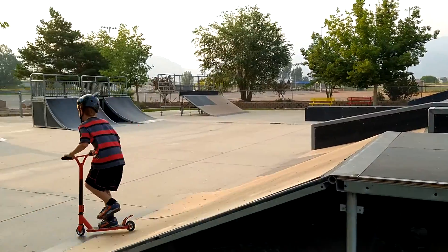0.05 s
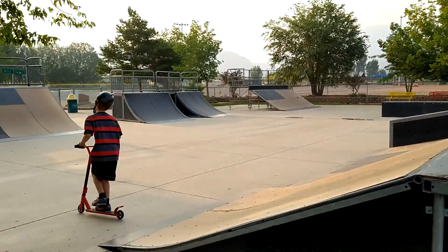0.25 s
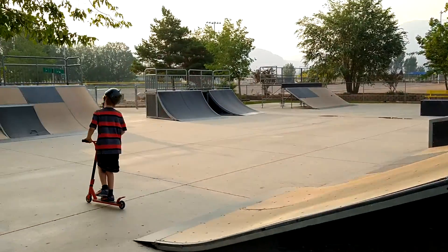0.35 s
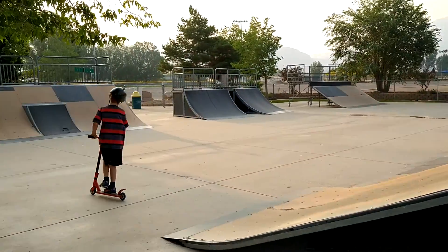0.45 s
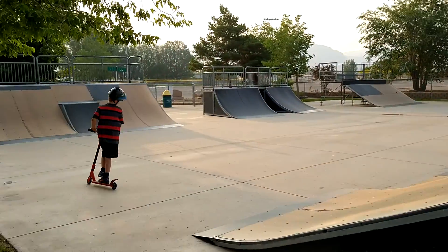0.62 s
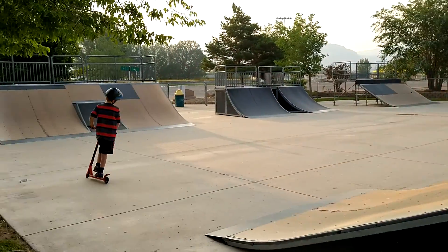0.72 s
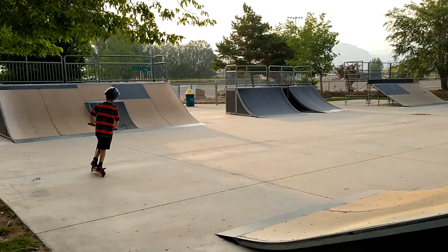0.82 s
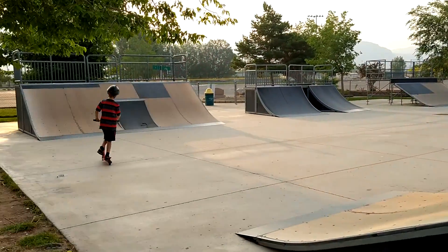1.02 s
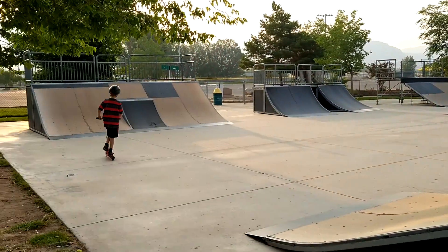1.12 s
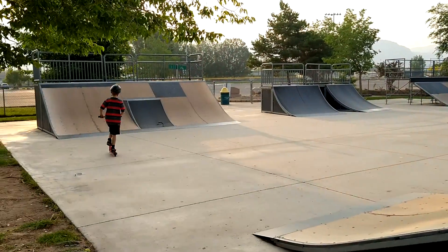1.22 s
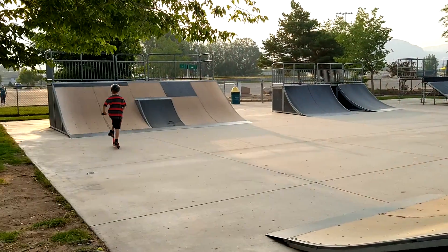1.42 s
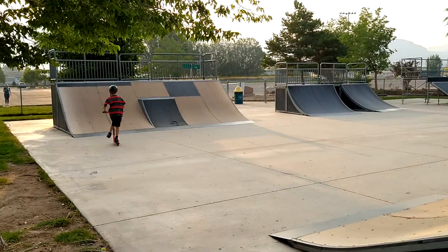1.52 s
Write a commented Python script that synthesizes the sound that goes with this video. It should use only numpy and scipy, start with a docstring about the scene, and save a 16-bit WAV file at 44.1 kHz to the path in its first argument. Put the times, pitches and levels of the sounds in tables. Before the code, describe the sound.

Close to a mono microphone in a quiet outdoor skate park, a kick scooter drums down a ramp, chatters off the lip and clatters onto concrete. Its hissing wheels and small rattles then move away.

```python
"""A hollow rumble, close by: a kick scooter rolls down a skate ramp whose panels drum under the wheels.
It chatters off the lip and lands on gritty concrete with a bright clatter that rings its metal frame.
A loose part clacks, then the hissing wheels and small rattles move away from the microphone.
Behind lies the quiet air of an open park, with faint far tones and a thin whistle. One mono microphone."""
import sys
import numpy as np
from scipy import signal
from scipy.fft import rfft, irfft, next_fast_len
from scipy.io import wavfile
from scipy.ndimage import map_coordinates

SR = 44100
rng = np.random.default_rng(int(sys.argv[2]) if len(sys.argv) > 2 else 0)


def materialize(psi):
    """Save the field psi as 16-bit PCM at rate SR to the path in sys.argv[1].

    A 1-D psi becomes a single channel; in a 2-D psi each row is a channel.
    """
    bounded = np.clip(np.atleast_2d(psi).T, -1, 1)
    quanta = np.round(bounded * 32767).astype(np.int16)
    wavfile.write(sys.argv[1], SR, quanta)


N = 68355

# the ramp drumming under the wheels: pitch_hz, level_db
DRUM_SPECTRUM = [(25, -34.5), (55, -5), (85, -12.5), (115, 3), (150, -4.5), (220, 1), (290, -11.5),
                 (400, -15.5), (700, -26.5), (1100, -24), (1450, -37), (1900, -31), (2300, -40.5),
                 (4000, -55)]
# its swell and fall: time_s, level_db
DRUM_LEVEL = [(0, -44.5), (.12, -43.5), (.21, -40), (.255, -30), (.32, -38.5), (.37, -33.5), (.42, -43),
              (.49, -56.5), (.58, -56.5), (.65, -57.5), (.76, -80.5), (1.55, -77.5)]
# wheels strike the ramp: start_s, level_db, tilt_db_per_octave
THUMPS = [(0.002, -37.5, -8.5), (.092, -35, -6), (0.167, -31, 0), (0.2319, -21.5, 3.5), (.271, -34.5, 4.5),
          (0.288, -26, -1.5), (0.311, -30, -0.5), (.351, -32.5, 7), (0.373, -37, -3.5)]
# modes of the ramp's panels: pitch_hz, level_db, t60_s
PANEL_MODES = [(75, -16.5, 0.2), (115.2, -8, 0.1594), (165, -3.5, 0.06), (214, 0.5, 0.089),
               (249.2, -4, 0.074), (310, -9, 0.048)]
# wheels and bearings: pitch_hz, level_db
HISS_SPECTRUM = [(900, -30), (1450, -5), (1900, -16), (2450, -13), (3150, -10), (3600, -.5), (4300, 1),
                 (5000, -3), (6500, -3), (8500, 0), (10800, -7), (11600, -14), (12700, -14), (13500, -22),
                 (14200, -35), (15800, -42)]
# their hiss before its lower part fades: time_s, level_db
HISS_LEVEL = [(0, -54), (.22, -54.5), (.33, -79), (.41, -48), (.5, -53), (.63, -58.5), (.79, -61),
              (.89, -58), (.99, -62.5), (1.16, -65.5), (1.23, -60), (1.35, -63.5), (1.55, -61.5)]
# the wheels' singing resonance: time_s, level_db
WHINE_LEVEL = [(0, -61.5), (.12, -65.5), (.2, -80.5), (.42, -56), (.52, -84), (.7, -69.5), (.82, -82.5),
               (1.55, -74.5)]
# open air: pitch_hz, level_db
AIR_SPECTRUM = [(25, -14), (50, 0), (80, 1.5), (120, 1.5), (200, -6.5), (310, -13.5), (520, -10), (800, -7),
                (1100, -7.5), (1500, -17), (1950, -18), (2600, -23.5), (4000, -39.5), (8000, -50.5)]
# light ticks of loose parts: start_s, level_db, tilt_db_per_octave
TICKS = [(.1865, -42, 1), (1.0708, -41.5, 2), (1.1348, -41.5, 0), (1.2016, -51, -1), (1.214, -47, -4),
         (1.22, -49, -4), (1.2695, -49, 1), (1.404, -43.5, 0), (1.449, -52, 0), (1.473, -49, 1),
         (1.517, -52, 0), (1.54, -49, 0)]
# dense small resonances of struck metal: pitch_hz, level_db
METAL_SPECTRUM = [(300, -20), (1000, -15), (1950, -21), (2350, -9), (2900, -7.5), (3600, -1), (4300, -1),
                  (5000, -4), (6300, -.5), (7400, 4.5), (9000, 3.5), (11000, 4.5), (11600, -7),
                  (12700, -5.5), (13500, -15), (15800, -32)]
# decay of the echo off the surrounding ramps: pitch_hz, t60_s
PARK_DECAY = [(200, 0.86), (3000, .45), (8000, 0.28), (14000, 0.27)]
# heavy metal contacts: start_s, level_db, tilt_db_per_octave
CLACKS = [(.2352, -29, -1), (.239, -36, -2), (.2435, -37, -1), (.2515, -42, -3), (.3376, -22, -2),
          (.3396, -11.5, -1.5), (.3442, -7.5, 2), (.3464, -6.8, 3), (.3515, -14, -1.5), (.3545, -19, -1),
          (.3612, -23, 2), (.3655, -27, 1), (.3705, -18.5, 2), (.377, -15, 2.5), (.3798, -17.5, 2),
          (.384, -24, 1), (.388, -28, 1), (.4125, -42, 0), (.4605, -37, 1), (.4622, -34, 1)]
# modes of frame and deck: pitch_hz, level_db, t60_s
FRAME_MODES = [(3560, -12, .08), (4334, -8, .12), (5338, -11, .12), (6000, -7, .08), (6460, -6, .1),
               (6970, -3, .11), (7555, -4, .1), (7850, 1, .1), (8405, -5, .11), (9310, -4, .11),
               (9428, -5, .11), (10370, 3, .075), (11060, 1, .08), (12550, -8, .06)]
# the front wheel chatters off the lip: start_s, level_db
FORK_HITS = [(.237, -37), (0.2414, -38.5), (0.2488, -40), (.261, -36.5)]
# modes of the front fork: pitch_hz, level_db, t60_s
FORK_MODES = [(3850, -6, .03), (4151, -2, .04), (4400, -7, .03)]
# grit crushed at the foot of the ramp: pitch_hz, level_db
GRIT_SPECTRUM = [(240, -47), (400, -3.5), (780, -8), (854, -8), (1370, -13.5), (1820, -8.5), (2000, -15.5),
                 (3660, -14), (9960, -19), (15000, -46.5)]
# a loose part, perhaps the brake, slaps twice: start_s, level_db
SLAPS = [(0.576, -30.5), (0.584, -30)]
# modes of that part: pitch_hz, level_db, t60_s
SLAP_MODES = [(3600, -8, .04), (4530, 0, .06), (5950, -1, .075), (8600, -5, .045), (12100, -10, .03),
              (12600, -7, .03)]
# tones far across the park: start_s, length_s, first_hz, last_hz, level_db
FAR_TONES = [(.58, 0.1, 1440, 1373, -71.5), (.665, 0.115, 585, 622, -61), (.79, 0.054, 795, 792, -67),
             (.97, .09, 879, 920, -67), (.965, 0.2, 1105, 1050, -63), (1.12, 0.136, 1100, 1070, -68),
             (1.19, 0.076, 1360, 1340, -69.5), (1.195, 0.067, 760, 713, -68), (1.33, 0.08, 885, 850, -63),
             (1.47, 0.11, 1180, 1205, -68)]
# a thin far whistle: start_s, length_s, first_hz, last_hz, level_db
WHISTLE = [(1.428, 0.083, 4440, 4510, -65.5)]
# blurred sound around the whistle: start_s, length_s, first_hz, last_hz, level_db
WHISTLE_HAZE = [(1.435, .15, 5600, 5300, -66), (1.44, .16, 4950, 4620, -67.5),
                (1.465, 0.107, 4170, 3910, -67), (1.49, 0.071, 3450, 3400, -74.5)]

METAL_ATTACK_S = .0003


def amp(db):
    """Decibels to gain."""
    return 10 ** (np.asarray(db) / 20)


def unit(x):
    """Scale to rms 1."""
    return x / np.sqrt(np.mean(x ** 2) + 1e-20)


def along(points, hz):
    """Read (pitch_hz, value) points on a log frequency axis."""
    pitches, values = np.transpose(points)
    return np.interp(np.log(hz + 1), np.log(pitches + 1), values)


def curve(rows):
    """One value per sample from (time_s, value) points."""
    return np.interp(np.arange(N) / SR, *np.transpose(rows))


def wobble(rate):
    """A smooth random curve, rate knots a second."""
    return map_coordinates(rng.standard_normal(N // 8), [np.arange(N) * rate / SR], mode="wrap")


def filtered(x, response):
    """Filter x by a gain given as a function of frequency."""
    size = next_fast_len(len(x) + 8192)
    return irfft(rfft(x, size) * response(np.fft.rfftfreq(size, 1 / SR)), size)[:len(x)]


def low_cut(x, corner_hz, order):
    """Roll off the sound below the corner."""
    return filtered(x, lambda hz: 1 - 1 / (1 + (hz / corner_hz) ** order))


def peak(hz, centre_hz, width_hz):
    """Gain of a single resonance."""
    return 1 / (1 + (2 * (hz - centre_hz) / width_hz) ** 2)


def noise(spectrum, size=N, tilt_db=0):
    """Coloured noise of rms 1, tilted by tilt_db per octave."""
    white = rng.standard_normal(size)
    return unit(filtered(white, lambda hz: amp(along(spectrum, hz) + tilt_db * np.log2(hz + 1))))


def add(track, start_s, sound):
    """Mix a sound into the track."""
    part = track[round(start_s * SR):][:len(sound)]
    part += sound[:len(part)]


def ring(modes, t, scatter_db):
    """Damped modes, with new strengths and phases at each strike."""
    return sum(amp(db + scatter_db * rng.standard_normal() - 60 * t / t60)
               * np.sin(2 * np.pi * (hz * t + rng.random())) for hz, db, t60 in modes)


def metal_onset(t):
    """The near-instant rise of a metal contact."""
    return 1 - np.exp(-t / METAL_ATTACK_S)


def crack(t, tilt_db, t60_s, tail_db, tail_t60_s):
    """Dense metal resonances die fast and leave a softer shimmer."""
    decay = amp(-60 * t / t60_s) + amp(tail_db - 60 * t / tail_t60_s)
    return decay * noise(METAL_SPECTRUM, len(t), tilt_db)


def ramp():
    """The hollow ramp drums under the wheels and booms at its seams and lip."""
    out = amp(curve(DRUM_LEVEL) + .5 * wobble(37)) * noise(DRUM_SPECTRUM)
    t = np.arange(SR // 2) / SR
    attack_s, pivot_hz = .0035, 200
    onset = np.sin(np.pi / 2 * np.minimum(t / attack_s, 1)) ** 2
    for start_s, db, tilt_db in THUMPS:
        modes = [(hz, level + tilt_db * np.log2(hz / pivot_hz), t60) for hz, level, t60 in PANEL_MODES]
        add(out, start_s, amp(db) * onset * ring(modes, t, scatter_db=-.5))
    return out


def wheel_hiss():
    """Wheels and bearings hiss, coloured by the frame; the lower part fades faster with distance."""
    frame = lambda hz: 1 + .45 * sum(peak(hz, mode_hz, width_hz=110) for mode_hz, _, _ in FRAME_MODES)
    hiss = unit(filtered(noise(HISS_SPECTRUM), frame))
    body_hz, fade_start_s, fade_db_per_s = 4900, .75, 45
    body = filtered(hiss, lambda hz: 1 / (1 + (hz / body_hz) ** 8))
    fade = amp(-fade_db_per_s * np.maximum(np.arange(N) / SR - fade_start_s, 0))
    level_db = curve(HISS_LEVEL) + .6 * wobble(40) + 1.2 * wobble(410)  # sway and fine grain
    return amp(level_db) * (hiss - (1 - fade) * body)


def wheel_whine():
    """Rolling keeps one narrow resonance of the wheels singing."""
    band = filtered(rng.standard_normal(N), lambda hz: peak(hz, centre_hz=1859, width_hz=160))
    return amp(curve(WHINE_LEVEL)) * unit(band)


def park_air():
    """Quiet open air wavers behind the scooter."""
    return amp(-62 + 1.8 * wobble(26)) * noise(AIR_SPECTRUM)


def rattle():
    """Small loose parts tick and die almost at once, mostly as the scooter rolls away."""
    out, t = np.zeros(N), np.arange(SR // 16) / SR
    for start_s, db, tilt_db in TICKS:
        tick = crack(t, tilt_db, t60_s=.009, tail_db=-20, tail_t60_s=.09)
        add(out, start_s, amp(db) * metal_onset(t) * tick)
    return low_cut(out, corner_hz=3940, order=6)


def park_echo(x):
    """The surrounding ramps answer with a tail whose treble dies first."""
    hz, t, spectra = signal.stft(rng.standard_normal(SR // 2), SR, nperseg=256)
    decay = amp(-60 * t / along(PARK_DECAY, hz)[:, None])
    tail = signal.istft(spectra * decay, SR, nperseg=256)[1]
    return signal.fftconvolve(x, tail / np.linalg.norm(tail))[:N]


def clatter():
    """At the lip and on landing, each metal contact cracks, shimmers and rings the frame."""
    out, t = np.zeros(N), np.arange(SR // 8) / SR
    for start_s, db, tilt_db in CLACKS:
        contact = crack(t, tilt_db, t60_s=.0135, tail_db=-15.5, tail_t60_s=.08)
        frame = amp(-23) * ring(FRAME_MODES, t, scatter_db=5)
        add(out, start_s, amp(db) * metal_onset(t) * (contact + frame))
    return out


def fork():
    """The front fork rings briefly as its wheel chatters off the lip."""
    out, t = np.zeros(N), np.arange(SR // 8) / SR
    for start_s, db in FORK_HITS:
        add(out, start_s, amp(db) * metal_onset(t) * ring(FORK_MODES, t, scatter_db=-.5))
    return out


def grit():
    """The front wheel reaches the concrete and crunches over fine grit."""
    start_s, rise_s, fall_db_per_s, grains_per_s = .25, .018, 170, 4000
    t = np.maximum(np.arange(N) / SR - start_s, 0)
    impulses = (rng.random(N) < grains_per_s / SR) * rng.standard_normal(N)
    grains = unit(filtered(impulses, lambda hz: amp(along(GRIT_SPECTRUM, hz))))
    crunch = unit(grains + 3 * noise(GRIT_SPECTRUM))
    return crunch * np.minimum(t / rise_s, 1) ** 2 * amp(-34.5 - fall_db_per_s * t)


def slaps():
    """A loose metal part gives a tight double click with a ring of its own."""
    out, t = np.zeros(N), np.arange(SR // 8) / SR
    for start_s, db in SLAPS:
        click = crack(t, tilt_db=-.9, t60_s=.013, tail_db=-15, tail_t60_s=.11)
        ringing = amp(-14) * ring(SLAP_MODES, t, scatter_db=5.5)
        add(out, start_s, amp(db) * metal_onset(t) * (click + ringing))
    return low_cut(out, corner_hz=2800, order=4)


def far_tones(rows, rough, width_hz):
    """Faint gliding tones blurred by distance; rough runs from 0 (pure) to 1 (a noise band)."""
    out = np.zeros(N)
    for start_s, length_s, first_hz, last_hz, db in rows:
        n = int(length_s * SR)
        flutter = (wobble(width_hz) + 1j * wobble(width_hz))[:n]
        blur = np.sqrt(1 - rough) + np.sqrt(rough / 2) * flutter
        cycles = np.cumsum(np.linspace(first_hz, last_hz, n)) / SR
        tone = np.real(blur * np.exp(2j * np.pi * cycles))
        add(out, start_s, amp(db) * unit(tone) * signal.windows.tukey(n, .5))
    return out


def scuff():
    """A soft high swish swells and fades as the scooter rolls on."""
    centre_hz, spread_octaves, peak_s, spread_s = 7700, .3, .886, .044
    bell = lambda hz: np.exp(-.5 * (np.log2((hz + 1) / centre_hz) / spread_octaves) ** 2)
    swell = np.exp(-.5 * ((np.arange(N) / SR - peak_s) / spread_s) ** 2)
    return amp(-54) * swell * unit(filtered(rng.standard_normal(N), bell))


def far_whistle():
    """A thin whistle, far off, spreads into a soft haze."""
    return far_tones(WHISTLE, rough=.45, width_hz=130) + far_tones(WHISTLE_HAZE, rough=.97, width_hz=650)


def scene():
    """Scooter and ramp in front, the park behind; only the knocks and the crunch echo."""
    knocks = clatter() + fork() + slaps() + rattle() + grit()
    rolling = ramp() + wheel_hiss() + wheel_whine() + scuff()
    echo = amp(-22) * park_echo(knocks)
    distance = park_air() + far_whistle() + far_tones(FAR_TONES, rough=.6, width_hz=100)
    return (knocks + echo + rolling + distance)[None]


def record(dry):
    """The microphone thins the deepest bass and keeps nothing above its band limit."""
    low_cut_hz, top_hz = 28, 15900
    microphone = lambda hz: (1 - 1 / (1 + (hz / low_cut_hz) ** 2)) * (hz < top_hz)
    return np.array([filtered(channel, microphone) for channel in dry])


dry = scene()
out = record(dry)
materialize(out)
```